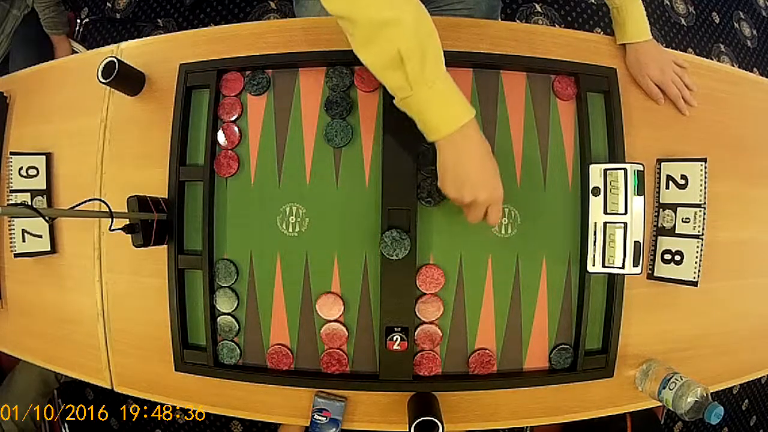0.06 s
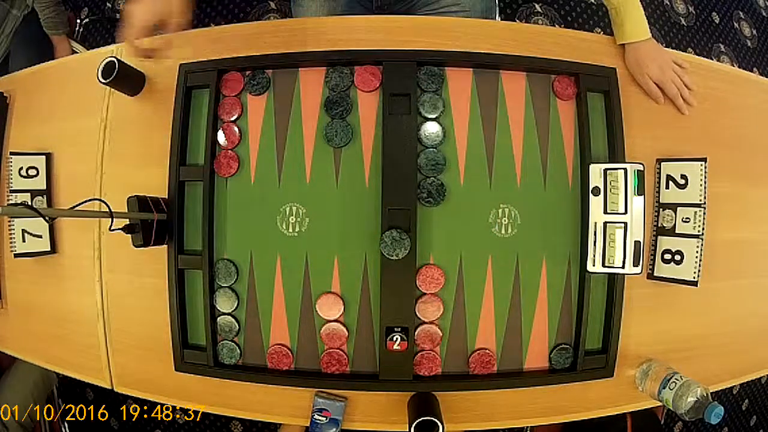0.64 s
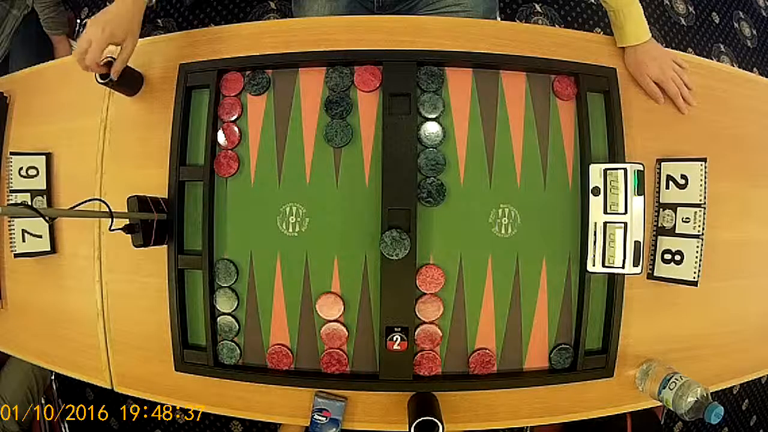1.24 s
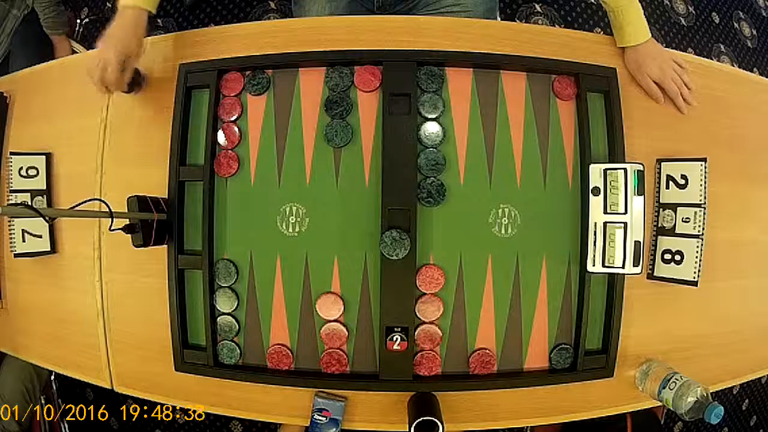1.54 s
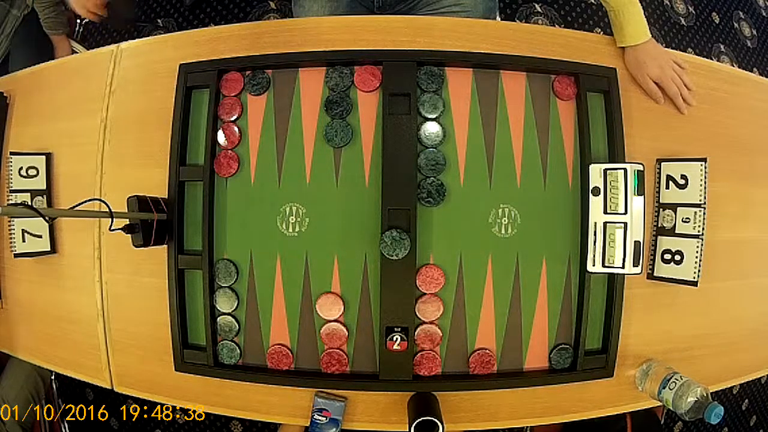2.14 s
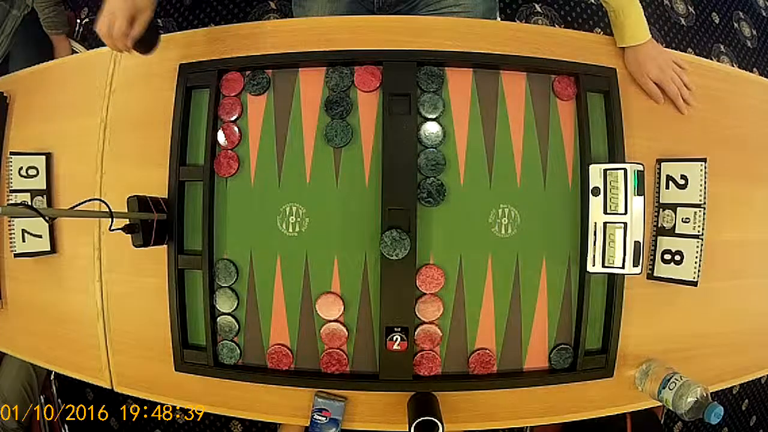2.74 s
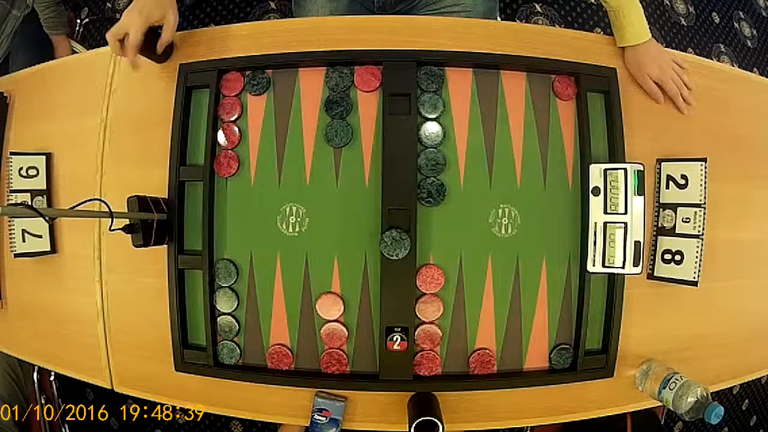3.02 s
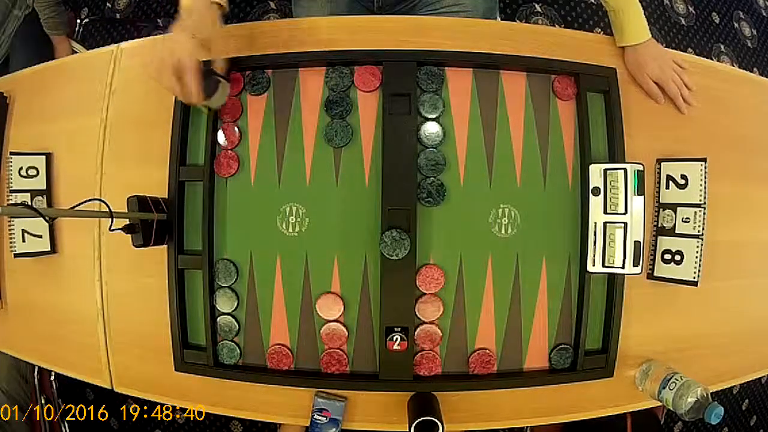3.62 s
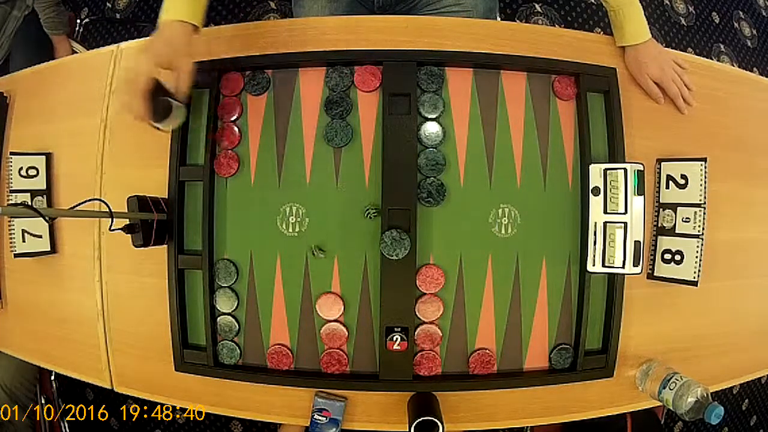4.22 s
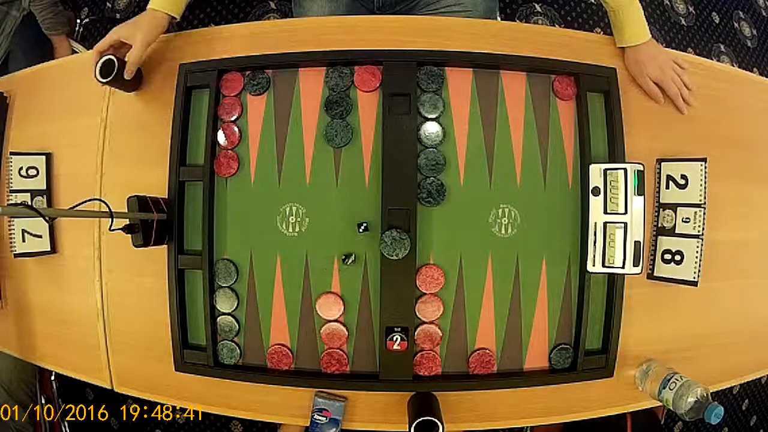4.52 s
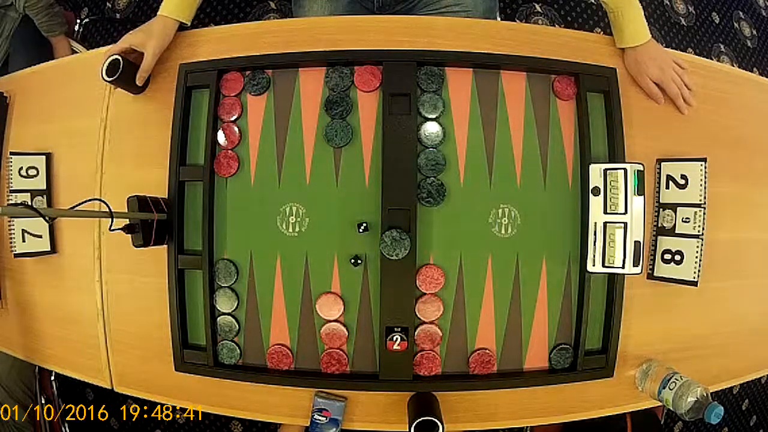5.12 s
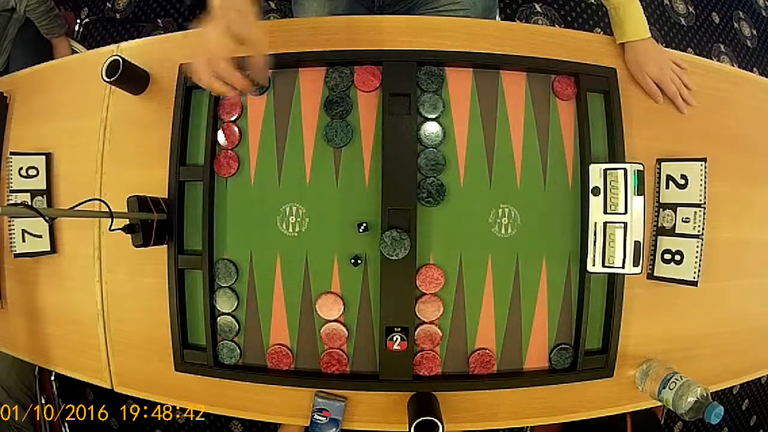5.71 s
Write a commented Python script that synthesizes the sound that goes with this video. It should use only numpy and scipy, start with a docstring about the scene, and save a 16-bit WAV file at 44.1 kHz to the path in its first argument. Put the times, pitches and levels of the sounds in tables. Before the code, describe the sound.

Two dice clatter unevenly inside a cup for about three seconds, just after a checker is set down. The shaking peaks early with a loud bang of the cup on the table. After a short pause the dice tap onto the board, followed by dull knocks, the cup being put down and one more checker clack. A microphone over the board picks up a slight hall echo and a faint, steady ventilation rumble.

```python
"""Backgammon in a quiet hall

A checker is set down; two dice rattle in a cup, which is slammed on the table, shaken again,
emptied and put away; a last checker lands. Each impact is a brief force that excites the damped
modes of cup wall, air column, board or table. The hall answers the blows with early reflections
and a reverberant tail, over a faint rumble of ventilation."""
import sys
import numpy as np
from scipy import signal
from scipy.fft import rfft, irfft, next_fast_len
from scipy.io import wavfile

SR = 44100
rng = np.random.default_rng(int(sys.argv[2]) if len(sys.argv) > 2 else 0)


def wav_out(sig):
    """Save sig, one row per channel (or a flat mono array), as 16-bit PCM at SR to the path in sys.argv[1]."""
    wavfile.write(sys.argv[1], SR, np.round(np.clip(np.atleast_2d(sig).T, -1, 1) * 32767).astype(np.int16))


N = 258426

# Dice, and at the end the table, hit the cup. Each row: start in seconds, level of the wall
# overtones in dB, level of the air column in dB, its frequency in Hz.
CUP_HITS = [(0.878, -49.5, -51.5, 752), (0.974, -60, -56, 745), (1.04, -46, -46.5, 798),
            (1.069, -65, -43.5, 818), (1.126, -53.5, -50, 848), (1.195, -42, -56, 840),
            (1.284, -51.5, -42, 728), (1.292, -52, -40.5, 727), (1.342, -45.5, -45, 800),
            (1.449, -50.5, -39.5, 752), (1.487, -41, -38, 684), (1.508, -43, -38, 802),
            (1.564, -38, -21.5, 737), (1.6, -49.5, -35, 760), (1.623, -44, -37.5, 754),
            (1.655, -32.5, -28, 776), (1.66, -38, -34, 811), (1.726, -57, -30.5, 746),
            (1.741, -49, -28, 734), (1.747, -60.5, -27.5, 745), (1.755, -46.5, -41, 715),
            (1.808, -46.5, -42, 747), (1.825, -38.5, -30.5, 680), (1.905, -39, -32, 673),
            (1.961, -36.5, -27.5, 795), (2.109, -51.5, -38.5, 766), (2.214, -52, -41.5, 767),
            (2.276, -44.5, -37, 790), (2.37, -53, -38.5, 845), (2.437, -46.5, -37, 855),
            (2.535, -51.5, -39.5, 754), (2.585, -48, -33.5, 750), (2.695, -60, -46, 760),
            (2.755, -47, -41.5, 757), (2.868, -66.5, -54, 760), (2.918, -50.5, -43, 780),
            (3.018, -53, -39.5, 758), (3.081, -50, -36.5, 778), (3.173, -53.5, -43, 758),
            (3.242, -47.5, -42.5, 777), (3.341, -53, -43.5, 754), (3.398, -43.5, -42, 762),
            (3.508, -62, -43, 760), (3.559, -54, -39.5, 784), (3.699, -56.5, -48, 790),
            (3.798, -63, -54, 747), (3.854, -59, -46.5, 858), (4.176, -77, -63, 870),
            (5.237, -40.5, -33.5, 841), (5.25, -42, -34.5, 864), (5.258, -44, -33.5, 860),
            (5.301, -38, -45, 870)]
# Die meets die, or checker meets checker. Each row: start in seconds, relative level in dB.
LOUD_CLICKS = [(0.231, -49), (1.126, -44.5), (1.19, -45), (1.2, -43), (1.595, -44.5), (1.613, -44),
               (1.6545, -41), (1.6586, -30), (1.748, -40.5), (1.756, -45), (1.817, -41), (1.8255, -39),
               (1.862, -39), (1.906, -45.5), (2.048, -49.5), (2.353, -49.5), (2.534, -43), (2.5925, -42.5),
               (3.705, -47.5), (5.719, -44.5)]
# Knocks of checkers, thrown dice and cup, and dull thuds of a hand on the table.
# Each row: start in seconds, relative levels in dB of hollow tone, weight and hard edge.
CHECKER_KNOCKS = [(0.219, -48.5, -51, -59), (0.23, -42, -49.5, -44.5), (0.234, -42, -60, -48.5),
                  (0.481, -48, -63, -61), (5.711, -48.5, -42, -48), (5.72, -32, -42.5, -39.5)]
DICE_BOUNCES = [(4.26, -47.5, -57, -54.5), (4.27, -43.5, -50, -49), (4.402, -50, -50.5, -70)]
CUP_AND_HAND_KNOCKS = [(0.801, -62, -52.5, -72), (0.811, -61, -52, -46.5), (1.147, -36, -44, -41),
                       (1.183, -34.5, -46, -40.5), (1.929, -32.5, -46.5, -48), (2.409, -36, -50, -63),
                       (2.452, -38, -50, -53), (2.491, -41.5, -47.5, -66), (2.579, -37, -44, -65),
                       (2.605, -56, -51, -64), (2.661, -40, -54, -63), (2.767, -50, -52.5, -61),
                       (3.022, -54.5, -47, -61), (4.44, -33, -43.5, -44), (4.446, -28, -49, -60),
                       (4.5, -46, -50.5, -50.5), (4.559, -47, -59, -63.5), (4.585, -38.5, -49, -43),
                       (4.63, -43.5, -54.5, -52.5), (4.93, -64, -59.5, -82.5), (5.17, -54.5, -57.5, -82.5),
                       (5.237, -32, -48, -39.5), (5.287, -55, -48.5, -36)]
# The rim ticks on the table as the cup settles. Each row: start in seconds, level in dB.
RIM_TICKS = [(4.558, -52.5), (5.237, -41), (5.288, -42)]
# Normal modes. Each row: frequency in Hz, bandwidth in Hz, relative level in dB.
CUP_WALL_MODES = [(2527, 170, 10.5), (2230, 300, 4), (2955, 210, -15.5), (4340, 190, -23),
                  (5786, 130, -15.5)]
TABLE_MODES = [(109.7, 10, -1), (143.3, 25, -6), (195.5, 26.6, -6), (214.6, 30.5, -3)]
BOARD_MODES = [(253.4, 13, 5.5), (312, 12, 6), (418.3, 37, 2), (457.6, 15, -2), (482, 15, -5),
               (594, 34, -2)]
# Spectra of the contacts and of the ventilation. Each row: frequency in Hz, relative level in dB.
CUP_CLACK_SPECTRUM = [(100, -21), (350, -10), (600, 8.5), (1200, 3), (1900, 1), (3400, -17.5), (5000, -23),
                      (7000, -32.5), (14000, -46.5)]
TUMBLE_SPECTRUM = [(500, -2), (1500, 11), (2400, 6.5), (4000, -1), (5200, -14.5), (7000, -27.5),
                   (8300, -20), (14000, -32)]
CLICK_SPECTRUM = [(1500, -15), (3500, -7.5), (5800, 6.5), (7000, 0.5), (8300, 7), (9800, -10.5),
                  (13000, -11.5), (16000, -17.5)]
BOARD_CLACK_SPECTRUM = [(120, -7.5), (400, -2), (800, 3.5), (1300, 0.5), (1900, -0.5), (2600, -19),
                        (4000, -57), (9000, -68)]
SNAP_SPECTRUM = [(1000, -9), (2300, 4.5), (3500, -3), (5000, -11.5), (6300, -27.5), (9000, -21),
                 (12000, -26), (16000, -34)]
THUMP_SPECTRUM = [(30, -21.5), (100, -5.5), (280, 3.5), (520, 1.5), (1000, -3), (1600, -27), (4000, -46.5),
                  (10000, -66.5)]
VENTILATION_SPECTRUM = [(12, -33.5), (20, -4), (33, -10), (103, -5.5), (157, -5.5), (225, -9), (282, -8),
                        (1070, -24.5), (1230, -23.5), (1820, -26), (2030, -28), (2840, -29.5), (3080, -30),
                        (13100, -32), (15500, -34)]
# Decay of the hall. Each row: frequency in Hz, reverberation time in seconds.
HALL_T60 = [(100, 0.61), (260, 0.9), (700, 0.46), (1840, 0.48), (4850, 0.35), (12000, 0.35)]

USUAL_HIT_DB, USUAL_KNOCK_DB = -45, -37.5  # reference levels of an ordinary cup hit and knock
HARD_SHAKE_FROM_S, HARD_SHAKE_TO_S, SLAM_S, CUP_EMPTY_S = 1.44, 1.92, 1.859, 3.9
BLOW_SIZE = 16384  # samples in one impact
AGE = np.arange(BLOW_SIZE) / SR  # seconds since contact
BINS = np.fft.rfftfreq(BLOW_SIZE, 1 / SR)  # Hz


def cup_rattle():
    """Impacts excite the cup's wall and its air column, whose resonance shifts with the grip."""
    out, wall = np.zeros(N), minimum_phase(CUP_CLACK_SPECTRUM)
    wall_modes = resonances(CUP_WALL_MODES) * softness(hz=3970)
    corner = minimum_phase(SNAP_SPECTRUM) * softness(hz=5250)
    slide = minimum_phase(TUMBLE_SPECTRUM) * softness(hz=5490)
    choke = 1 / np.sqrt(1 + (AGE / 0.013) ** 6)  # the tone holds for 13 ms, then drops away
    pauses = np.diff([hit[0] for hit in CUP_HITS], append=np.inf)
    for (start, wall_db, air_db, hz), pause in zip(CUP_HITS, pauses):
        force_db = (wall_db + air_db) / 2 - USUAL_HIT_DB
        hard = HARD_SHAKE_FROM_S < start < HARD_SHAKE_TO_S
        contrast = 1 + hard * 0.46  # in the hard shake strong hits stand out more
        clack_db = -53 + contrast * 0.63 * force_db + hard * 8.5
        snap_db = -53.5 + contrast * 0.6 * (wall_db - USUAL_HIT_DB) + hard * 5
        skids = pause < 0.075 and not hard  # the die slides straight over to the next hit
        tumble_db = snap_db - 14 + skids * 7.5 - hard * 4.5  # shaken hard, dice fly more than tumble
        grip = np.exp(0.39 * rng.standard_normal())  # the hand's damping varies from hit to hit
        air = amp(air_db) * ring(hz, t60=0.1 * grip, rise=0.00052) * choke
        clack = amp(clack_db) * strike(wall, t60=0.017, rise=0.0006)
        overtones = amp(wall_db) * strike(wall_modes, t60=0.002, rise=0.0001)
        snap = amp(snap_db) * strike(corner, t60=0.021, rise=0.00029)
        tumble = amp(tumble_db) * die_tumble(slide, t60=0.32, contacts_per_s=330)
        clatter = clack + overtones + snap + tumble
        # the cup's mouth faces the listener, so its tone is drier than the clatter of its wall
        add(out, start, in_hall(air, near_db=-10, hall_db=-10.5))
        add(out, start, in_hall(clatter, near_db=-7, hall_db=-8 - hard * 2.5))
    return out


def die_tumble(response, t60, contacts_per_s):
    """A tumbling die makes a Poisson train of tiny, weakening impulses, each sounding the response."""
    contacts = (rng.random(BLOW_SIZE) < contacts_per_s / SR) * rng.standard_normal(BLOW_SIZE)
    touch = unit_blow(irfft(response))
    return signal.fftconvolve(contacts * fade(AGE, t60), touch)[:BLOW_SIZE]


def cup_slam():
    """The slammed cup's air resonates for a few cycles while the blow drives table and board modes."""
    out = np.zeros(N)
    swell = np.sin(np.pi * np.minimum(AGE / 0.0072, 1))
    pop = amp(-3.2) * swell * np.sin(2 * np.pi * 800 * AGE)
    add(out, SLAM_S, in_hall(pop, near_db=-18, hall_db=-17))
    add(out, SLAM_S + 0.0062, amp(-12) * pop)  # a short echo of the pop, 6 ms later
    boom = amp(-41) * strike(resonances(TABLE_MODES) * softness(hz=311), t60=0.0042, rise=0.0011)
    thud = amp(-29) * strike(resonances(BOARD_MODES), t60=0.0047, rise=0.0021)
    thump = amp(-24) * strike(minimum_phase(THUMP_SPECTRUM), t60=0.05, rise=0.0016)
    add(out, SLAM_S + 0.00092, in_hall(boom + thud + thump, near_db=-2, hall_db=-8))
    return out


def knocks(blows, tone_hz, tone_t60, boom_db, thud_db, clack_db, snap_db, hall_db, low_hall_db):
    """A blow excites table and board modes and a hollow tone; hard edges add treble."""
    out, face = np.zeros(N), minimum_phase(BOARD_CLACK_SPECTRUM)
    edge = minimum_phase(SNAP_SPECTRUM) * softness(hz=4300)
    table = resonances(TABLE_MODES) * softness(hz=346.6)
    board = resonances(BOARD_MODES) * softness(hz=807)
    hollow = resonances([(tone_hz, 260, 0)]) * softness(hz=1020)
    for start, tone_db, weight_db, edge_db in blows:
        boom = amp(weight_db + boom_db) * strike(table, t60=0.0063, rise=0.001384)
        thud = amp(weight_db + thud_db) * strike(board, t60=0.0057, rise=0.002)
        tone = amp(tone_db) * strike(hollow, t60=tone_t60, rise=0.00037)
        clack = amp(edge_db + clack_db) * strike(face, t60=0.023, rise=0.00092)
        snap = amp(edge_db + snap_db) * strike(edge, t60=0.014, rise=0.0011)
        lightness_db = 0.13 * (USUAL_KNOCK_DB - tone_db)  # a light touch sounds more reverberant
        contact = amp(-lightness_db / 2) * (tone + clack + snap)
        add(out, start, in_hall(contact, near_db=-8, hall_db=hall_db + lightness_db))
        # the large surfaces radiate their low notes into the whole hall
        add(out, start, in_hall(boom + thud, near_db=-3, hall_db=low_hall_db))
    return out


def piece_clicks():
    """Hard pieces touch only briefly when they collide, so their click reaches high frequencies."""
    out, piece = np.zeros(N), minimum_phase(CLICK_SPECTRUM)
    collisions = []
    for start, wall_db, _, _ in CUP_HITS:
        if start < CUP_EMPTY_S:  # the dice meet each other just after each hit on the wall
            delay = 0.009 * rng.random()
            db = -50 + 0.35 * (wall_db - USUAL_HIT_DB) + 2 * rng.standard_normal()
            collisions.append((start + delay, db))
    for start, db in list(LOUD_CLICKS) + collisions:
        click = amp(db - 17.5) * strike(piece, t60=0.0089, rise=0.00072)
        add(out, start, in_hall(click, near_db=-14, hall_db=-11.5))
    return out


def rim_ticks():
    """The hard rim touches the table with no weight behind it, so the impact lacks low frequencies."""
    out = np.zeros(N)
    edge = minimum_phase(SNAP_SPECTRUM) * softness(hz=4750) * (1 - softness(hz=2980))
    for start, db in RIM_TICKS:
        tick = amp(db) * strike(edge, t60=0.013, rise=0.002)
        add(out, start, in_hall(tick, near_db=-13.5, hall_db=-17))
    return out


def in_hall(direct, near_db, hall_db):
    """Direct sound, early reflections from table and players, and diffuse reverberation superpose."""
    hz, frame_s, noise = signal.stft(rng.standard_normal(SR * 2 // 3), SR, nperseg=256)
    decay = fade(frame_s, log_interp(HALL_T60, hz)[:, None])
    tail = signal.istft(noise * decay, SR, nperseg=256)[1]
    t = np.arange(len(tail)) / SR
    tail *= 1 - np.exp(-(t / 0.01) ** 2)  # the far walls take time to answer
    near = rng.standard_normal(len(t)) * fade(t, 0.073) * (t > 0.003)
    paths = amp(hall_db) * tail / np.linalg.norm(tail) + amp(near_db) * near / np.linalg.norm(near)
    paths[0] = 1  # the direct path
    return signal.fftconvolve(direct, paths)


def ventilation():
    """Moving air makes stationary broadband noise: a rumble with a thin hiss."""
    size = next_fast_len(N + BLOW_SIZE)
    gain = amp(log_interp(VENTILATION_SPECTRUM, np.fft.rfftfreq(size, 1 / SR)))
    air = irfft(rfft(rng.standard_normal(size)) * gain, size)[:N]
    return amp(-63) * air / np.std(air)


def strike(response, t60, rise):
    """Source and filter: a rough contact force builds up and dies away, driving a linear response."""
    spectrum = rfft(rng.standard_normal(BLOW_SIZE) * fade(AGE, t60))
    force = irfft(spectrum / np.abs(spectrum))  # it feeds all frequencies evenly
    force *= fade(AGE, 10 * t60) * (1 - np.exp(-AGE / rise))
    return unit_blow(irfft(rfft(force) * response))


def ring(hz, t60, rise):
    """A single mode in free vibration gives a damped sinusoid."""
    return unit_blow(np.sin(2 * np.pi * hz * AGE) * fade(AGE, t60) * (1 - np.exp(-AGE / rise)))


def resonances(modes):
    """Modal superposition: a body responds as a sum of damped oscillators, here of alternating sign."""
    return sum((-1) ** k * amp(db) * 1j * BINS * width / (hz * hz - BINS ** 2 + 1j * BINS * width)
               for k, (hz, width, db) in enumerate(modes))


def minimum_phase(spectrum):
    """Folding the cepstrum gives a causal response with this magnitude spectrum."""
    cepstrum = irfft(np.log(amp(log_interp(spectrum, BINS))))
    cepstrum[1:BLOW_SIZE // 2] *= 2
    cepstrum[BLOW_SIZE // 2 + 1:] = 0
    return np.exp(rfft(cepstrum))


def softness(hz):
    """A contact of finite duration acts as a low-pass filter, exciting little above hz."""
    return 1 / (1 + 1j * BINS / hz - (BINS / hz) ** 2)


def unit_blow(x):
    """A blow is normalised to rms 1 over its first 10 ms."""
    return x / np.sqrt(np.mean(x[:SR // 100] ** 2) + 1e-20)


def amp(db):
    """Amplitude grows tenfold for every 20 dB."""
    return 10 ** (np.asarray(db) / 20)


def fade(t, t60):
    """Damping gives exponential decay, 60 dB in t60 seconds."""
    return np.exp(-np.log(1000) * t / t60)


def log_interp(points, hz):
    """Values between (Hz, value) points follow a logarithmic frequency axis."""
    frequencies, values = np.transpose(points)
    return np.interp(np.log(hz + 1), np.log(frequencies), values)


def add(track, start, x):
    """A sound superposes on the track from start, in seconds."""
    part = track[round(start * SR):][:len(x)]
    part += x[:len(part)]


def scene():
    """The pressures of all sources add at one point above the board."""
    checkers = knocks(CHECKER_KNOCKS, tone_hz=685, tone_t60=0.032, boom_db=-6.5, thud_db=-2,
                      clack_db=4, snap_db=-7.5, hall_db=-8, low_hall_db=-6.5)
    dice = knocks(DICE_BOUNCES, tone_hz=870, tone_t60=0.044, boom_db=-19, thud_db=2,
                  clack_db=0.5, snap_db=-36, hall_db=-1, low_hall_db=-2)
    cup_and_hand = knocks(CUP_AND_HAND_KNOCKS, tone_hz=873, tone_t60=0.033, boom_db=-9.5, thud_db=-2,
                          clack_db=2.5, snap_db=-18.5, hall_db=-8, low_hall_db=-6.5)
    game = cup_rattle() + piece_clicks() + checkers + dice + cup_and_hand + rim_ticks() + cup_slam()
    return (game + ventilation())[None]


def record(dry):
    """An ideal low-pass filter limits the band to 15.8 kHz."""
    size = next_fast_len(N + BLOW_SIZE)
    passband = np.fft.rfftfreq(size, 1 / SR) < 15800
    return irfft(rfft(dry, size) * passband, size)[:, :N]


dry = scene()
out = record(dry)
wav_out(out)
```